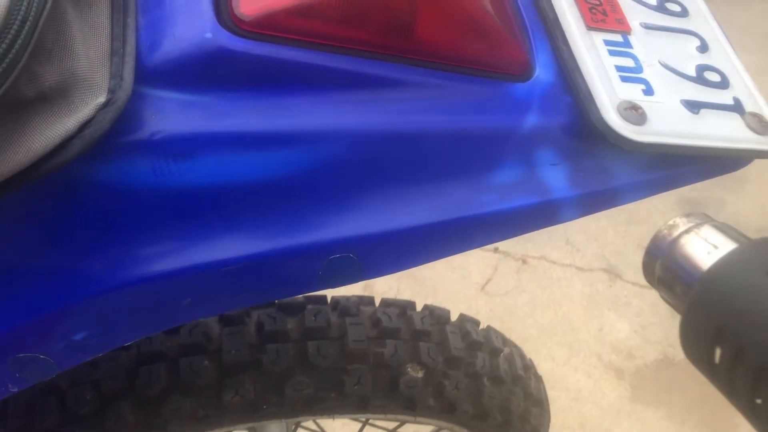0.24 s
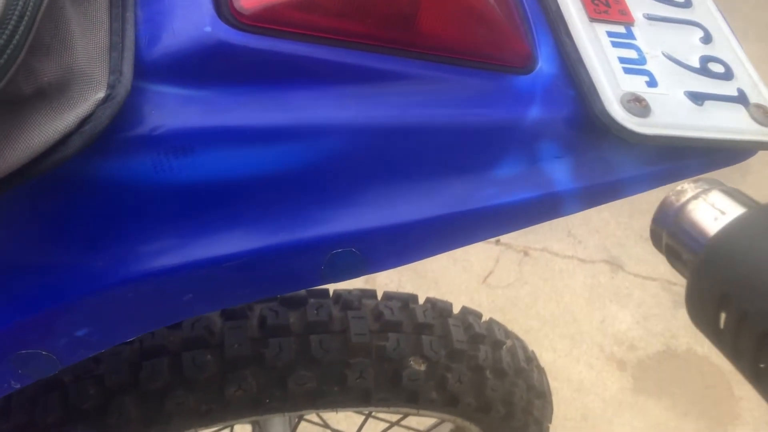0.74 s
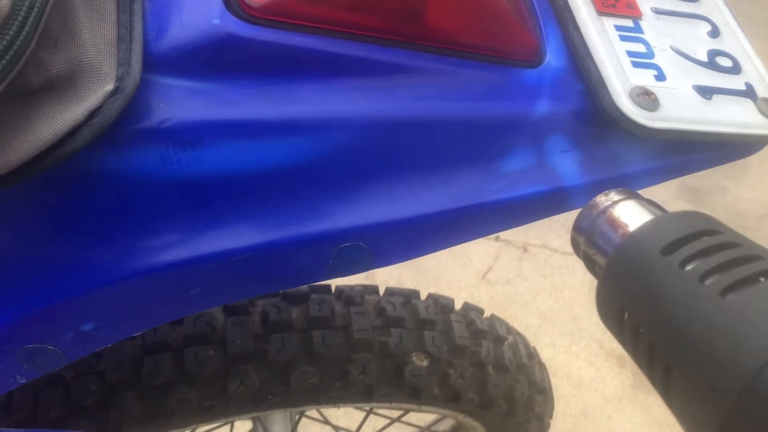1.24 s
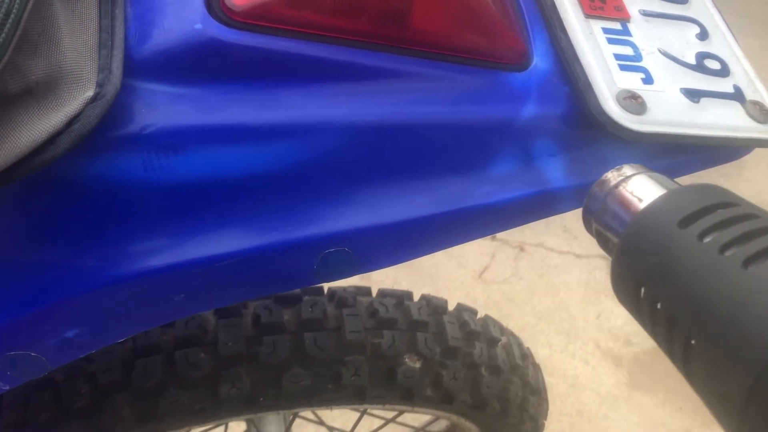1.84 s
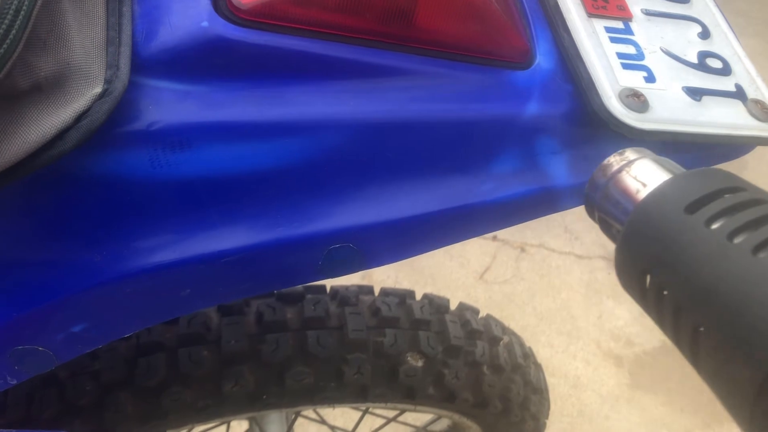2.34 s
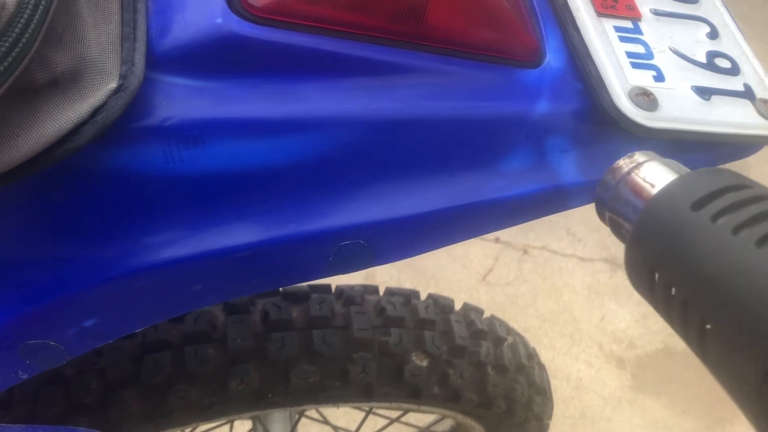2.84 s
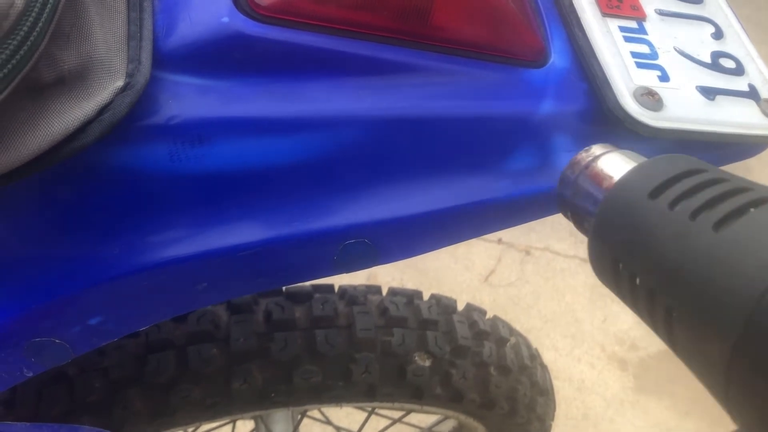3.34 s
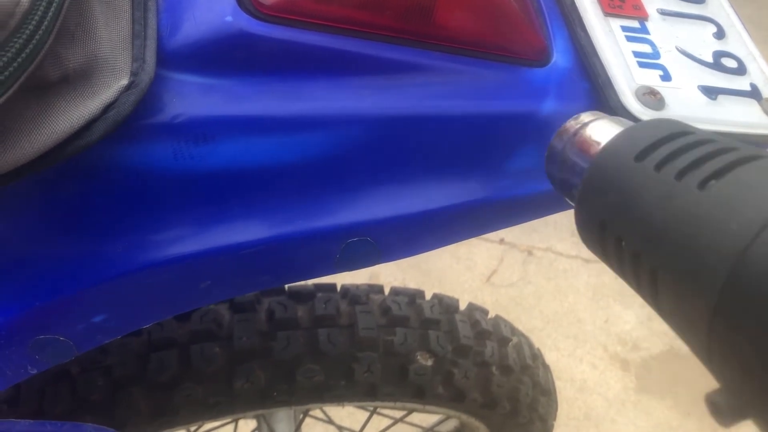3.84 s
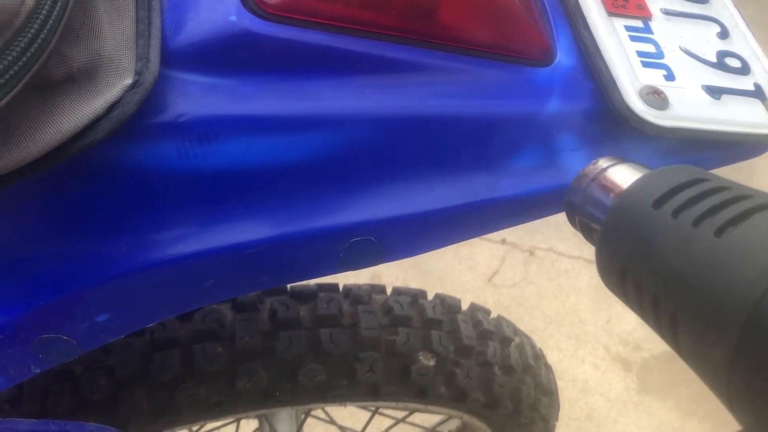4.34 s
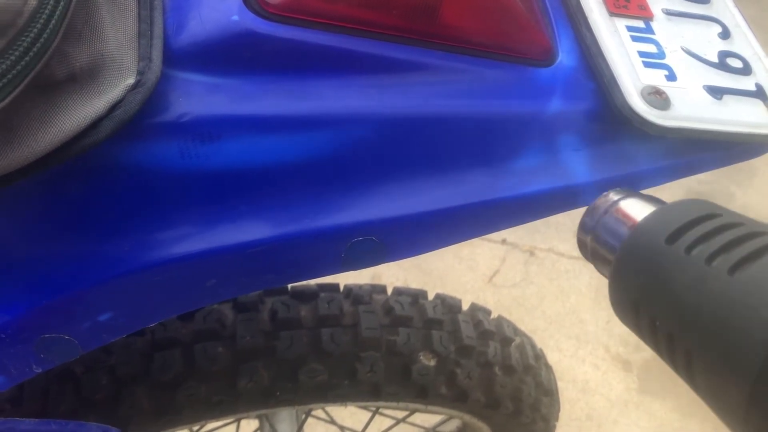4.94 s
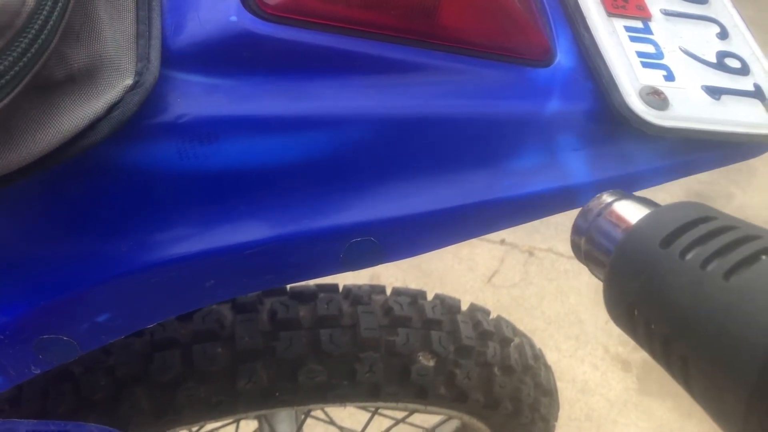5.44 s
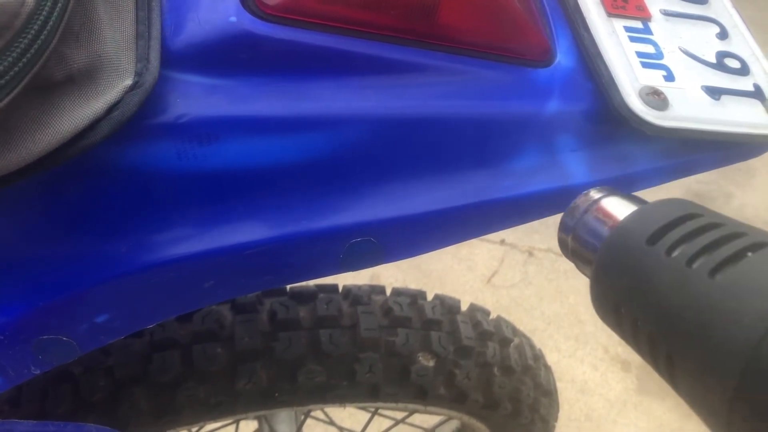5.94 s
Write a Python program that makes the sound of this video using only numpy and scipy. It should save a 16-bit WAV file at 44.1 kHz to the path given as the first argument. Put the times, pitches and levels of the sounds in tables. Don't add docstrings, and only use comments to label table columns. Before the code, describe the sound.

Just switched on, a heat gun quickly settles into a constant buzzy whine and airy roar, shifting slightly in tone as it is waved around.

```python
import sys
import numpy as np
from scipy import signal
from scipy.fft import rfft, irfft, next_fast_len
from scipy.io import wavfile

SR = 44100
rng = np.random.default_rng(int(sys.argv[2]) if len(sys.argv) > 2 else 0)


def magnitude_from_level(level_db):
    exponent = np.asarray(level_db, float) / 20
    return 10 ** exponent


def store_wav(level_fs):
    pcm = np.round(np.clip(np.atleast_2d(level_fs), -1, 1) * 32767)
    wavfile.write(sys.argv[1], SR, pcm.T.astype(np.int16))


N = 273327

# t/s, swing away [-1..1], tilt [-1..1], nearness to the panel [-1..1]
HAND_AIM = [(0.1, 1.0, -0.17, 0.2), (0.5, 0.87, -0.5, -0.1), (1.0, 0.27, 0.3, -0.46),
            (1.45, -0.04, 1.0, -0.48), (2.0, -0.1, 0.85, 0.0), (2.7, -0.08, 0.42, -0.1),
            (3.15, -0.1, 0.0, 0.55), (3.75, -0.15, -0.04, 1.0), (4.15, -0.22, -0.15, 0.45),
            (5.1, -0.27, -0.57, 0.0), (5.7, -0.3, -0.66, -0.7), (6.2, -0.33, -0.52, -0.82)]
# t/s, f/Hz (turns per second)
CRUISE_SPEED = [(0, 228.32), (.8, 228.24), (1.3, 228.1), (2.3, 227.52), (2.8, 227.53), (3.3, 227.72),
                (4.1, 227.82), (4.75, 228.05), (5.3, 228.03), (6.2, 227.93)]
# multiple of shaft speed, level/dB, then dB per unit of swing, tilt, nearness
FAN_TONES = [(1, -53.5, -1.4, -0.1, 1.1), (2, -70.0, 7.3, 1.2, 0.8), (3, -61.5, 2.6, -1.3, 1.0),
             (4, -71.5, 0.1, 0.0, 0.1), (5, -70.6, -0.0, 0.1, 0.1), (6, -49.3, -0.7, -0.1, 1.1),
             (7, -47.6, -3.3, -1.1, -0.4), (8, -63.2, 2.2, 0.9, 0.5), (9, -73.9, 0.5, -0.1, 0.1),
             (10, -73.2, 4.3, -2.0, -2.1), (11, -73.5, -0.9, 1.1, -2.5), (12, -69.1, 4.3, 4.7, 2.0),
             (13, -69.3, -4.7, 0.1, -0.1), (14, -83.1, -0.3, -0.0, 0.0), (15, -68.7, -2.8, 3.1, 0.9),
             (16, -84.3, 0.3, 0.0, -0.1), (17, -70.7, -0.7, 0.2, 1.0)]
# multiple, level/dB, swing/dB, tilt/dB, nearness/dB
BRUSH_TONES = [(19, -69.0, -7.2, 1.2, 0), (20, -62.5, -2.8, -0.9, 2.8), (21, -66.5, -3.9, 5.5, -4.7),
               (22, -66.7, -1.1, -5.6, 0.8), (23, -70.0, -2.7, -0.5, -0.6), (24, -65.5, -15.5, -1.0, 3.2),
               (25, -67.8, -10.0, 1.1, -0.1), (26, -70.0, 3.9, -6.5, -2.4), (27, -78.8, 1.2, -5.3, -1.5),
               (28, -72.0, 0.0, -0.8, 1.9), (29, -77.0, -0.4, -2.0, 1.9), (30, -76.0, -4.9, -1.9, -2.3),
               (31, -82.0, -8.2, 0.2, -6.3), (32, -72.7, 1.2, 4.3, 2.9), (33, -80.0, -3.2, -5.0, -0.6),
               (36, -79.6, -5.8, -0.5, -3.4), (39, -81.8, 2.3, 0.7, 2.2), (40, -77.2, 2.5, -0.7, 0.7)]
# multiple, level/dB, swing/dB, tilt/dB, nearness/dB
SEGMENT_TONES = [(41, -84.3, 3.6, 3.3, -1.7), (43, -84.6, 0, 1.8, 2.5), (46, -86.5, 2.5, -1.6, -2.5),
                 (49, -90.3, 5.8, 2.6, -3.7), (52, -92.8, -5.7, 0.4, -6.1), (54, -92.8, -3.0, 4.8, -1.7),
                 (58, -96.7, 8.8, 2.0, -0.8), (59, -95.1, 3.9, -3.6, 0), (60, -86.5, -0.6, -1.2, 2.0),
                 (64, -94.5, 1.2, 4.8, 2.0), (65, -94.5, 5.5, 4.4, 2.2)]
# multiple, level/dB
RASP_FADE_OUT = [(34, -84.0), (44, -88), (48, -98.0), (58, -100.0), (69, -102.5)]
# multiple, level/dB
SUPPLY_RIPPLE_TONES = [(10, -79), (19, -81), (22, -77), (23, -74), (24, -80), (25, -79), (29, -86),
                       (30, -86)]
# f/Hz, level/dB (per Hz)
AIR_COLOUR = [(150, -67), (330, -70), (520, -58), (700, -49.5), (1350, -50), (1850, -58.5), (2300, -71),
              (4500, -67.5), (6000, -71), (6400, -78.5), (8500, -75.5), (11000, -88.5), (13000, -87),
              (15800, -103)]
# f/Hz, width/Hz, level/dB at the panel, level/dB swung away
BARREL_RESONANCES = [(799, 17, 4.5, 12), (894, 33, -10.5, -4), (1038, 59, 3, 4), (1804, 180, 2, 3),
                     (2220, 24, 4, 4), (3457, 320, 7, -0.5), (3600, 360, -2.5, 11), (4300, 220, -2, -2),
                     (5100, 300, -5.5, -6), (6000, 290, 3.5, 3), (6500, 250, -1.5, -3), (6830, 200, 5.5, 2),
                     (7000, 140, -2, -9), (7430, 250, 3, -1), (8500, 220, -2.5, -3), (10000, 400, 1, 7),
                     (12000, 600, -3, 1), (5040, 120, -1, 0), (5700, 98, -3.5, -6), (7600, 150, -0.5, -3),
                     (9500, 200, -2.5, -2), (12900, 500, -5, -3), (14200, 500, -3, -3)]
# t/s, length/s, level/dB
PANEL_SURGES = [
    (3.25, .25, 1.5),
    (5.15, .2, 1.5),
    (5.5, 0.13, 1.5),
]
# t/s, ring f/Hz, peak level/dB, t60/s
NEARBY_TAPS = [
    (3.283, 1250, -32, 0.03),
    (3.283, 2700, -39, 0.012),
    (3.284, 3150, -45, 0.012),
    (3.283, 5300, -45, .01),
    (5.468, 700, -35.5, 0.064),
]
# t/s, firing f/Hz, level/dB
ENGINE_NOTE = [
    (0, 78.3, -60),
    (.78, 95, -55.5),
    (1.19, 91.8, -57.5),
    (1.8, 78, -57),
    (2.15, 99.8, -59),
    (2.5, 110, -80),
    (3.4, 110, -69),
    (4.1, 100.6, -63),
    (6.2, 96.4, -58),
]
# f/Hz, level/dB
MACHINE_HUM = [(122, -67.5), (137, -68.5), (146, -66.5), (268, -76.5), (390, -78)]
# t/s, length/s, level/dB
MIC_GUSTS = [
    (.12, 0.26, 6),
    (.33, 0.062, 12),
    (.6, 0.088, 6.5),
    (1.7, 0.31, 4),
    (3.6, .15, 10),
    (4.1, 0.3, 6.5),
    (4.45, .12, 11.5),
    (5.05, 0.38, 10.5),
]
# f/Hz, level/dB (per Hz)
PRESSURE_COLOUR = [(.5, -41), (2.5, 0), (4.5, 4.5), (8, -2.5), (14, -12), (19, -13), (30, -39)]
# f/Hz, level/dB (per Hz)
RUMBLE_COLOUR = [(12, 0.5), (22, 0.5), (32, -7), (48, -3), (70, -7.5), (100, -20), (150, -20.5),
                 (220, -24.5), (330, -31.5), (600, -45.5)]


def motor(turn, flutter_db, smear, lift_db):
    wake_db, wake_s, wake_multiple, wake_span = -9, 0.15, 23, 5
    mains_ripple_hz = 120
    t = np.arange(N) / SR
    swing, tilt, near = in_time(HAND_AIM)
    waking_db = wake_db * np.exp(-(t / wake_s) ** 2)
    out = np.zeros(N)
    for multiple, level_db, swing_db, tilt_db, near_db in FAN_TONES + BRUSH_TONES + SEGMENT_TONES + rasp():
        beam_db = swing_db * swing + tilt_db * tilt + near_db * near
        wander_db = flutter_db * np.sqrt(multiple / 20) * drift(3.3)
        wake_share = np.exp(-((multiple - wake_multiple) / wake_span) ** 2)
        tone_db = level_db + beam_db + wander_db + waking_db * wake_share + lift_db * multiple / 60
        out += magnitude_from_level(tone_db) * np.sin(multiple * turn + smear * multiple ** 2)
    ripple = 2 * np.pi * mains_ripple_hz * t
    for multiple, level_db in SUPPLY_RIPPLE_TONES:
        phase = multiple * turn + ripple + rng.uniform(0, 2 * np.pi)
        out += magnitude_from_level(level_db + 2 * flutter_db * drift(1.5)) * np.sin(phase)
    return np.sqrt(2) * out


def shaft_angle():
    spin_up_lag_hz, spin_up_s = 6.2, 0.107
    cruise_hz, = in_time(CRUISE_SPEED)
    age = np.arange(N) / SR / spin_up_s
    shaft_hz = cruise_hz - spin_up_lag_hz * (1 + age) * np.exp(-age)
    return 2 * np.pi * np.cumsum(shaft_hz + 0.042 * drift(7.3))


def rasp():
    first, last, scatter_db = 34, 69, 2.5
    taken = np.array(BRUSH_TONES + SEGMENT_TONES)[:, 0]
    multiples = np.setdiff1d(np.arange(first, last + 1), taken)
    level_db = np.interp(multiples, *np.transpose(RASP_FADE_OUT))
    level_db = level_db + scatter_db * rng.standard_normal(len(multiples))
    no_beam = np.zeros((len(multiples), 3))
    return np.column_stack([multiples, level_db, no_beam]).tolist()


def air(split_hz, patchy_db):
    roar_db, roar_rise_db, roar_rise_s = -46.5, 0.56, 1.3
    hiss_db = -55
    t = np.arange(N) / SR
    throat_db = roar_db - roar_rise_db * np.exp(-t / roar_rise_s) + swells(PANEL_SURGES)
    away = np.clip(in_time(HAND_AIM)[0], 0, 1)
    spectrum, hz = noise(AIR_COLOUR)
    centre_hz, width_hz, aimed_db, away_db = np.transpose(BARREL_RESONANCES)
    bells = 1 / (1 + (2 * (hz[:, None] - centre_hz) / width_hz) ** 2)
    upper = 1 / (1 + (split_hz / hz) ** 8)
    out = np.zeros(N)
    for share, level_db in ((1 - upper, throat_db), (upper, hiss_db)):
        band = spectrum * np.sqrt(share)
        aimed = rms_one(band * magnitude_from_level(bells @ aimed_db))
        swung = rms_one(band * magnitude_from_level(bells @ away_db))
        gain = magnitude_from_level(level_db + 1.0 + patchy_db * drift(24))
        out += gain * ((1 - away) * aimed + away * swung)
    return out


def taps():
    out = np.zeros(N)
    for start_s, hz, peak_db, t60 in NEARBY_TAPS:
        age = np.maximum(np.arange(N) / SR - start_s, 0)
        decay_db = np.minimum(60 * age / t60, 200)
        out += magnitude_from_level(peak_db - decay_db) * np.sin(2 * np.pi * hz * age)
    return out


def far_machines(waver_db):
    firing_hz, level_db = in_time(ENGINE_NOTE)
    out = magnitude_from_level(level_db + 1.1 * drift(4)) * np.sin(2 * np.pi * np.cumsum(firing_hz) / SR)
    for hz, hum_db in MACHINE_HUM:
        pitch_hz = hz + 1.147 * drift(1.85)
        out += magnitude_from_level(hum_db + waver_db * drift(3.9)) * np.sin(2 * np.pi * np.cumsum(pitch_hz) / SR)
    return np.sqrt(2) * out


def breeze():
    pressure_db, rumble_db = -30, -45.5
    rumble_follows = 0.15
    gust_db = swells(MIC_GUSTS)
    pressure = magnitude_from_level(pressure_db + gust_db) * rms_one(noise(PRESSURE_COLOUR)[0])
    pressure *= np.minimum(np.arange(N) / SR / 0.03, 1)
    lumps_db = rumble_follows * gust_db + 1.33 * drift(8.6)
    return pressure + magnitude_from_level(rumble_db + lumps_db) * rms_one(noise(RUMBLE_COLOUR)[0])


def swells(rows):
    t = np.arange(N) / SR
    return sum(rise_db * np.exp(-0.5 * (2 * (t - s) / length) ** 2) for s, length, rise_db in rows)


def in_time(rows):
    s, *columns = np.transpose(rows)
    return [np.interp(np.arange(N) / SR, s, column) for column in columns]


def drift(rate_hz):
    pole = np.exp(-2 * np.pi * rate_hz * 40 / SR)
    chance = rng.standard_normal(N // 40 + 2002)
    slow = signal.lfilter([1], [1, -2 * pole, pole ** 2], chance)[2000:]
    return np.interp(np.arange(N) / 40, np.arange(len(slow)), slow / slow.std())


def noise(colour):
    size = next_fast_len(N)
    hz = np.arange(1, size // 2 + 2) * SR / size
    point_hz, point_db = np.transpose(colour)
    shape_db = np.interp(np.log(hz), np.log(point_hz), point_db, right=-140)
    return rfft(rng.standard_normal(size)) * magnitude_from_level(shape_db), hz


def rms_one(spectrum):
    x = irfft(spectrum, next_fast_len(N))[:N]
    return x / x.std()


def scene():
    whine = motor(shaft_angle() / SR, flutter_db=1.66, smear=0.7, lift_db=0.5)
    gun = whine + air(split_hz=2283, patchy_db=0.58)
    return (gun + taps() + far_machines(waver_db=3.5) + breeze())[None]


def band_limit(x):
    return signal.sosfilt(signal.butter(12, 15730, fs=SR, output="sos"), x)


def record(dry):
    return band_limit(dry)


dry = scene()
out = record(dry)
store_wav(out)
```